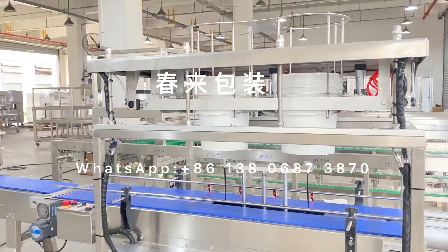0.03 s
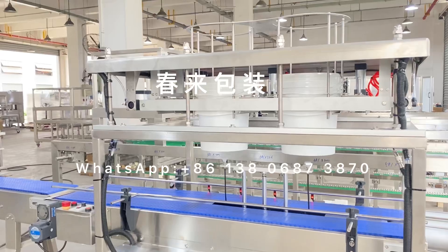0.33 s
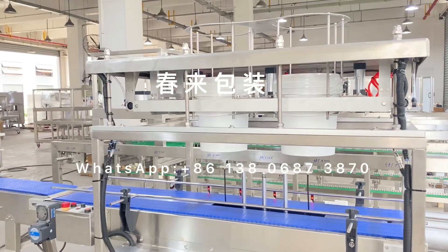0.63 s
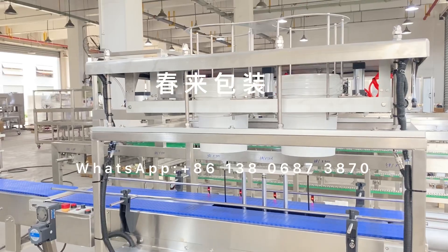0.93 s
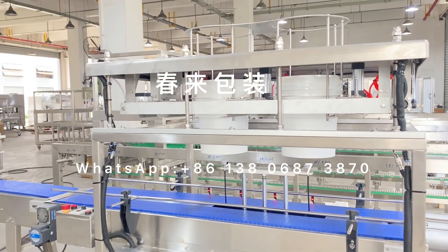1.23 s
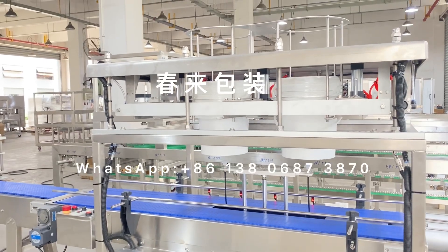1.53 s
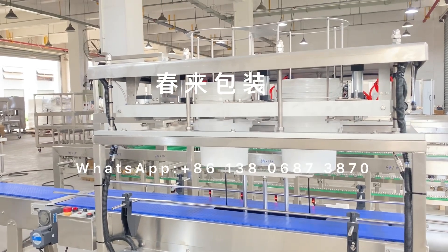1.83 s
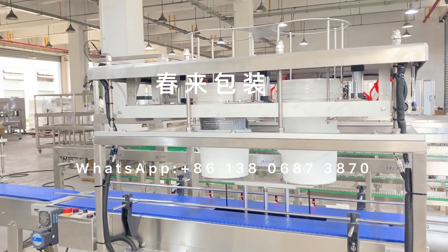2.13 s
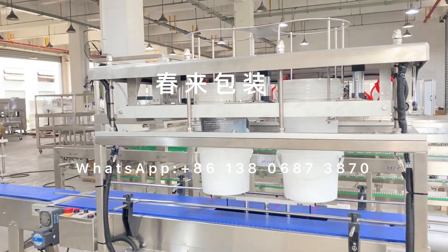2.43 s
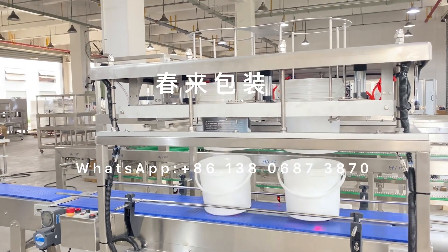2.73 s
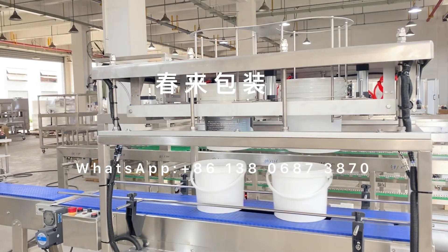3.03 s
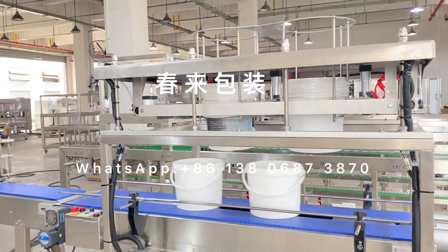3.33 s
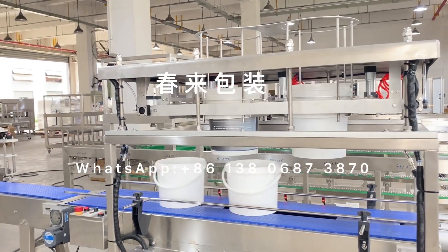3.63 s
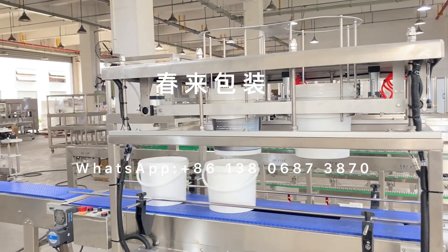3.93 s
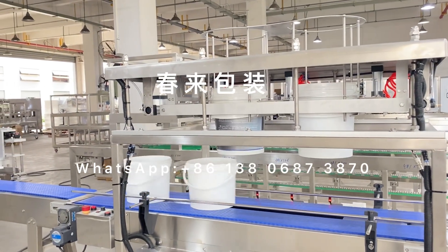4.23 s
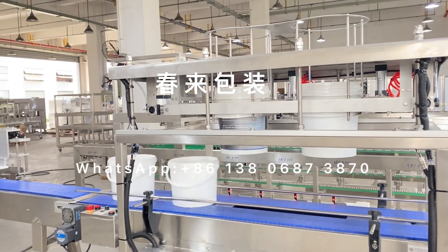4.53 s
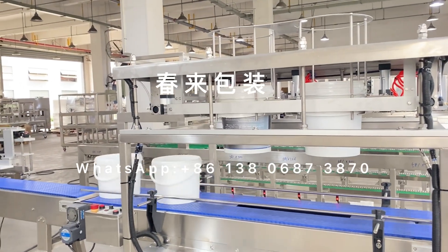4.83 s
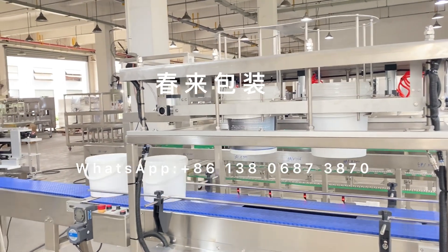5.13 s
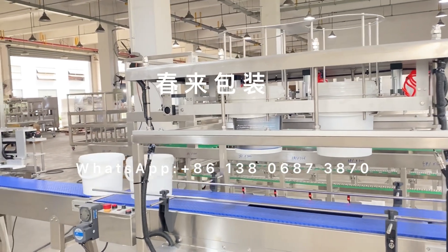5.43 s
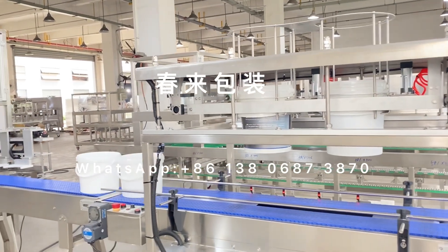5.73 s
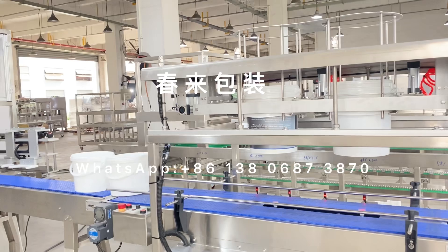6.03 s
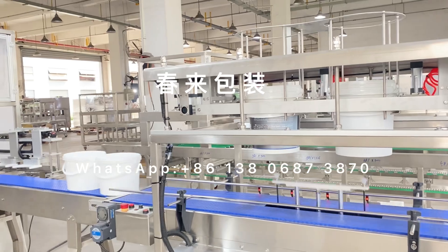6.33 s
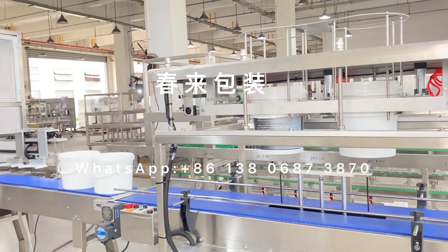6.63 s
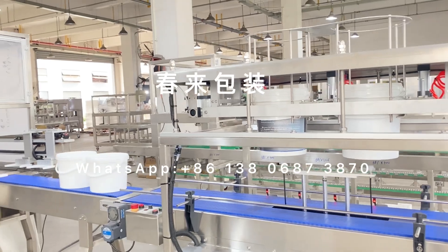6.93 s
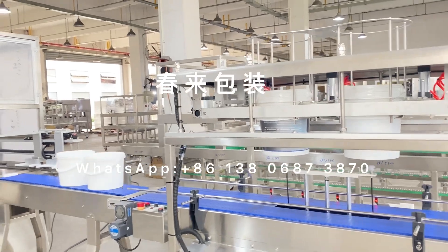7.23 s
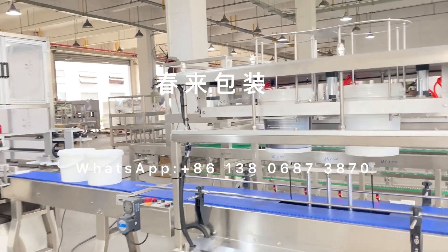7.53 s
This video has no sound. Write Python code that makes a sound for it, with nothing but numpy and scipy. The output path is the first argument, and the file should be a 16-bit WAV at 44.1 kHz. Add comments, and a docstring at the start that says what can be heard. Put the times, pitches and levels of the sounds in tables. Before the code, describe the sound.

Bright, steady compressed air rushes from a nearby bucket dispenser while motors hum and a belt rumbles. Pistons kick with puffs and sliding whistles, and two plastic buckets land with hollow thuds. The hiss dies away, leaving the conveyor and a few soft bumps against metal rails. Air then bursts on again with a squeak and keeps hissing through one more piston stroke, echoing in the factory hall.

```python
"""A pneumatic bucket dispenser over a conveyor in a factory hall. Vacuum ejectors hiss from the start;
motors hum and the belt rumbles throughout. From 1.4 s cylinders kick and vent with falling whistles.
Two plastic buckets drop on the belt near 2.8 and 3.4 s. The air shuts off at 3.7 s and the buckets
bump along the rails. At 5.7 s the air bursts on again, with a half-second blow-off jet."""
import sys
import numpy as np
from scipy import signal
from scipy.fft import rfft, irfft, next_fast_len
from scipy.io import wavfile
from scipy.ndimage import uniform_filter1d, map_coordinates

SR = 44100
rng = np.random.default_rng(int(sys.argv[2]) if len(sys.argv) > 2 else 0)


def persist_wave(psi):
    """Save psi, clipped to +-1, as 16-bit WAV."""
    counts = np.round(np.clip(psi, -1, 1) * 32767).astype(np.int16)
    wavfile.write(sys.argv[1], SR, np.atleast_2d(counts).T)


N = 334719

# Ejector valves. Each row: opens in s, shuts in s, level in dB, treble in dB, top shelf in dB.
VALVES = [(0, 1.76, -26, 1.5, 0), (1.75, 2.89, -25.5, -2.5, 1), (2.85, 3.704, -31, -0.5, -8),
          (5.743, 8, -24, 1.5, 0.5)]
# Cylinder strokes. Each row: start in s, relative kick, tube ring and puff levels in dB, puff t60 in s.
STROKES = [(1.442, -24, -15, -23, 0.9), (1.746, -23, -18, -23.5, 0.59), (2.74, -17, -51, -19, 0.28),
           (5.739, -22.5, -8.5, -19, 0.12), (6.611, -25, -14, -20, 0.43)]
RISE_PER_T60 = 0.043  # attack of squeaks and whistles


def amp(db):
    """Decibels to gain."""
    return np.exp(np.log(10) / 20 * np.asarray(db))


def unit(x):
    """x at rms 1."""
    return x / np.sqrt(np.mean(x ** 2) + 1e-20)


def along(points, hz):
    """(Hz, value) points read on a log axis."""
    knots_hz, values = np.transpose(points)
    return np.interp(np.log(hz + 1), np.log(knots_hz + 1), values)


def wobble(rate_hz):
    """Smooth random curve, rate_hz knots a second."""
    knots = rng.standard_normal(int(N * rate_hz / SR) + 4)
    return map_coordinates(knots, [np.arange(N) * rate_hz / SR])


def patches(shape, bins=3, frames=22):
    """Smooth random field over frequency and time."""
    return unit(uniform_filter1d(uniform_filter1d(rng.standard_normal(shape), bins, 0), frames, 1))


def filtered(x, response):
    """x through a fixed filter response(Hz)."""
    size = next_fast_len(x.shape[-1] + SR // 4)
    return irfft(rfft(x, size) * response(np.fft.rfftfreq(size, 1 / SR)), size)[..., :x.shape[-1]]


def swept(x, gain, size=256):
    """x through a moving filter gain(Hz, s)."""
    hz, t, spectra = signal.stft(x, SR, nperseg=size)
    return signal.istft(spectra * gain(hz[:, None], t), SR, nperseg=size)[1][:, :N]


def noise(spectrum, peaks=()):
    """Two unrelated noises, rms 1, with a (Hz, dB) spectrum and (Hz, width Hz, dB) resonances."""
    def colour(hz):
        resonance = sum(amp(db) / (1 + (2 * (hz - peak_hz) / width_hz) ** 2)
                        for peak_hz, width_hz, db in peaks)
        return amp(along(spectrum, hz)) * (1 + resonance)
    return unit(filtered(rng.standard_normal((2, N)), colour))


def whistle(centre_hz, width_hz):
    """Narrow noise band around a moving centre."""
    white = rng.standard_normal((2, 2, len(centre_hz)))
    flutter = filtered(white, lambda hz: 1 / (1 + (2 * hz / width_hz) ** 2))
    phase = 2 * np.pi * np.cumsum(centre_hz) / SR
    return unit(flutter[0] * np.cos(phase) + flutter[1] * np.sin(phase))


def held(t, on_s, off_s, rise_s, t60_s):
    """Rise at on_s, hold until off_s, then decay."""
    attack = 1 - np.exp(-np.maximum(t - on_s, 0) / rise_s)
    return attack * amp(-60 * np.maximum(t - off_s, 0) / t60_s)


def fade(t, t60_s, rise_s):
    """Soft attack at t = 0, exponential decay."""
    return held(t, 0, 0, rise_s, t60_s)


def ring(modes, t, pitch=1, length=1):
    """Damped modes of alternating sign; their strengths vary with each strike."""
    return sum((-1) ** k * amp(db + rng.normal(0, 1)) * fade(t, t60 * length, rise_s=0.0017)
               * np.sin(2 * np.pi * freq * pitch * t) for k, (freq, db, t60) in enumerate(modes))


def add(track, start_s, sound):
    """Mix a sound into a track."""
    part = track[..., round(start_s * SR):][..., :sound.shape[-1]]
    part += sound[..., :part.shape[-1]]


def jet(spectrum, peaks, echo_db, echoes=12):
    """Turbulent air, coloured by its outlet and rippled by echoes off steel panels."""
    delays_s = rng.uniform(.001, .022, echoes)
    panels = np.zeros(SR // 8)
    panels[np.round(delays_s * SR).astype(int)] = amp(echo_db) * rng.choice([-1, 1], echoes)
    panels[0] = 1
    return unit(signal.fftconvolve(noise(spectrum, peaks), panels[None], axes=1)[:, :N])


def flow(t, on_s, off_s, db, sag_db_per_s=1, shut_s=0.013, step_db=-3):
    """Jet amplitude: sags with the pressure, steps down when shut, rings on in the hall."""
    shut = np.clip((t - off_s) / shut_s, 0, 1)
    level_db = db - sag_db_per_s * (t - on_s) + step_db * shut
    return held(t, on_s, off_s, rise_s=0.0061, t60_s=1.6) * amp(level_db)


def valve_power(t):
    """Jet power, one row per ejector."""
    return np.array([flow(t, on_s, off_s, db) ** 2 for on_s, off_s, db, _, _ in VALVES])


def ejectors(dull_db_per_s=59, shelf_hz=12700, patchy_db=1.38):
    """The jets share one hiss through the silencers; it wanders with turbulence and dulls once shut."""
    # Jet spectrum. Each row: frequency in Hz, density in dB.
    spectrum = [(200, -30), (700, -9), (1450, -8.5), (1850, -5.5), (2400, -4.5), (3300, -4), (5000, 0.05),
                (6500, -0.3), (7200, -1.1), (8000, 1.5), (11000, -1.5), (13200, 2), (15500, -3)]
    # Silencer resonances. Each row: centre in Hz, width in Hz, level in dB re the jet.
    silencer = [(1611, 25, -7), (2016, 50, -2), (2103, 165, -6), (2505, 120, 1), (2867, 223, 2),
                (3156, 35, 6), (3300, 70, 4), (3390, 40, 2), (3660, 250, 1), (4090, 75, -3),
                (4410, 260, -8), (4560, 50, -3), (4772, 260, -9), (5102, 37, -5), (5360, 45, -11),
                (5632, 35, -8), (5770, 50, -12), (6108, 30, -5), (6525, 35, -8), (6652, 35, -7),
                (7085, 260, -2), (11477, 40, -8), (14797, 55, -5), (15647, 40, -7)]
    # Dulling by band. Each row: frequency in Hz, factor on the treble dB.
    dulling = [(3000, 0.078), (5000, 0.24), (7000, 0.78), (9500, 0.81), (12000, 0.99), (13800, 1.7),
               (16000, 1.5)]

    def colour(hz, t):
        power = valve_power(t) + 1e-20
        shares = power / power.sum(axis=0)
        treble_db = sum(share * (db - dull_db_per_s * np.clip(t - off_s, 0, .5))
                        for share, (_, off_s, _, db, _) in zip(shares, VALVES))
        shelf_db = np.array(VALVES)[:, -1] @ shares
        turbulence_db = patchy_db * patches((len(hz), len(t)))
        return amp(treble_db * along(dulling, hz) + shelf_db * (hz > shelf_hz) + turbulence_db)

    hiss = swept(jet(spectrum, silencer, echo_db=-19), colour, size=512)
    strength = np.sqrt(valve_power(np.arange(N) / SR).sum(axis=0))
    return hiss * strength * amp(0.19 * wobble(12))


def edge_tones(swing_db=2, swing_hz=4):
    """Air passing the ejectors' edges sings thin tones that come and go."""
    # Edge tones. Each row: centre in Hz, width in Hz, level in dB re the jet.
    tones = [(2013, 43, -29), (2508, 80, -23.5)]
    strength = np.sqrt(valve_power(np.arange(N) / SR).sum(axis=0))
    return strength * sum(amp(db + swing_db * wobble(swing_hz)) * whistle(np.full(N, hz), width_hz)
                          for hz, width_hz, db in tones)


def motors(motor_hz=49, octave_db=-10, fan_hz=171.5, fan_db=-49.5):
    """Wavering motor hum with its octave, and a faint fan drone."""
    # Hum envelope. Each row: time in s, level in dB.
    hum_levels = [(0, -55), (.5, -45), (1.15, -55), (1.7, -42.5), (2.4, -47), (4, -42.5), (6.7, -39),
                  (7.59, -45)]
    hum_db = np.interp(np.arange(N) / SR, *np.transpose(hum_levels))
    shaft = 2 * np.pi * np.cumsum(motor_hz + 1.54 * wobble(7)) / SR
    fundamental = np.sin(shaft) * amp(2.4 * wobble(7.7))
    octave = np.sin(2 * shaft) * amp(octave_db + 2.0 * wobble(6.9))
    fan_gain = amp(fan_db + 1.5 * wobble(8.6))
    fan_phase = 2 * np.pi * np.cumsum(fan_hz + 3 * wobble(11)) / SR
    return amp(hum_db) * unit(fundamental + octave) + fan_gain * np.sin(fan_phase)


def conveyor(spin_up_s=0.039, run_down_t60_s=2.1):
    """Rollers rumble unevenly; the sliding belt rustles and its drive whines faintly."""
    # Idling, belt run, lifter return. Each row: start in s, stop in s, rumble in dB, rustle in dB.
    drives = [(0, 8, -41, -44.5), (2.8, 7, -41.5, -43), (5.72, 6.3, -39.5, -39)]
    # Roller and belt spectra. Each row: frequency in Hz, density in dB.
    roller_spectrum = [(20, -38), (40, -24), (65, 1.5), (100, 0), (165, -1.5), (215, -4), (320, -2.5),
                       (450, -13), (900, -24), (2000, -42.5)]
    belt_spectrum = [(150, -52), (450, -1.5), (800, 0.5), (1400, -6), (2000, -8.5), (2130, -3.5),
                     (2260, -10), (3200, -12.5), (4200, -13), (5400, -15.5), (6500, -19), (8600, -18),
                     (11000, -23), (15500, -29)]
    # Drive whines. Each row: centre in Hz, width in Hz, level in dB re the rustle.
    whines = [(2680, 220, -6.5), (3320, 36, 6), (3630, 42, 1), (5500, 110, -6)]
    t = np.arange(N) / SR
    power = sum(np.outer(amp(levels_db), held(t, on_s, off_s, spin_up_s, run_down_t60_s)) ** 2
                for on_s, off_s, *levels_db in drives)
    rumble_gain, rustle_gain = np.sqrt(power)
    rollers = noise(roller_spectrum) * rumble_gain * amp(2.0 * wobble(22))
    belt = noise(belt_spectrum, whines) * rustle_gain * amp(0.95 * wobble(30))
    return rollers + belt


def squeaks():
    """Sliding parts squeak and opening air gaps spit; some sag in pitch."""
    # Squeaks. Each row: start in s, level in dB, pitch in Hz, sag in Hz/s, t60 in s, width in Hz.
    events = [(.215, -34, 3220, 3000, .22, 130), (.236, -25.5, 2540, 0, 0.11, 70),
              (1.752, -20.5, 7030, 2000, 0.16, 260), (2.745, -25, 3270, 0, .12, 160),
              (2.766, -31, 4130, 2200, 0.27, 109), (2.915, -32.5, 2524, 801, 0.86, 300),
              (3.17, -43, 1595, 30.5, 2.3, 65), (5.42, -42, 5300, 0, .2, 1410),
              (5.515, -43, 5300, 0, 0.18, 1410), (5.747, -11, 5780, 0, .07, 600),
              (5.88, -35, 2520, 0, 0.3, 50), (6.617, -24, 5780, -5, .09, 220),
              (6.96, -42, 2000, -1, 1.8, 60)]
    t, out = np.arange(SR) / SR, np.zeros((2, N))
    for start_s, db, hz, sag_hz_per_s, t60_s, width_hz in events:
        envelope = amp(db) * fade(t, t60_s, RISE_PER_T60 * t60_s)
        add(out, start_s, envelope * whistle(hz - sag_hz_per_s * t, width_hz))
    return out


def pistons(tube_hz=1050):
    """Each kick thumps the frame and rings the cylinder tube."""
    # Steel frame modes. Each row: frequency in Hz, level in dB, t60 in s.
    frame_modes = [(73.5, -5, 0.17), (118, -1, 0.095), (168, -1, 0.11), (279, -6.5, 0.097),
                   (369, -1, 0.048), (512, -5, 0.029), (750, -10.5, 0.052)]
    t, out = np.arange(SR // 2) / SR, np.zeros(N)
    for start_s, kick_db, tube_db, *_ in STROKES:
        tube = amp(tube_db + 5.5) * fade(t, t60_s=0.081, rise_s=.001) * np.sin(2 * np.pi * tube_hz * t)
        add(out, start_s, amp(kick_db - 0.5) * (ring(frame_modes, t) + tube))
    return out


def vents(lag_s=0.0037):
    """A puff of air escapes just after each kick."""
    # Vented air spectrum. Each row: frequency in Hz, density in dB.
    spectrum = [(200, -31), (900, -7), (1800, -6), (3000, -1), (5000, 5), (7000, 3), (11300, 3.5),
                (16000, -1)]
    t, envelope = np.arange(SR) / SR, np.zeros(N)
    for start_s, _, _, db, t60_s in STROKES:
        add(envelope, start_s + lag_s, amp(db) * fade(t, t60_s, rise_s=0.0011))
    return jet(spectrum, (), echo_db=-6) * envelope


def throttles(rest_hz=2432, tail_width_hz=340, sputter_db=0.5):
    """Each exhaust whistles down as the pressure drops, leaving a thin, lingering tail."""
    # Exhaust whistles. Each row: start in s, level in dB, first pitch in Hz, glide in s, t60 in s,
    # width in Hz, tail level in dB.
    exhausts = [(1.446, -22.5, 5820, .27, 0.36, 850, -56), (1.446, -29, 5150, .115, 0.59, 330, -50),
                (1.766, -23, 5047, .115, .38, 430, -35), (2.742, -31.5, 4416, 0.33, 0.42, 1105, -55),
                (5.756, -19, 4900, 0.11, 0.098, 700, -47), (6.616, -29, 5800, 0.093, 0.58, 1500, -52.5)]
    t, out = np.arange(SR) / SR, np.zeros((2, N))
    for start_s, db, start_hz, glide_s, t60_s, width_hz, tail_db in exhausts:
        centre_hz = rest_hz + (start_hz - rest_hz) / (1 + t / glide_s) ** 2
        burst = amp(db) * fade(t, t60_s, RISE_PER_T60 * t60_s) * whistle(centre_hz, width_hz)
        tail = amp(tail_db) * fade(t, t60_s=3, rise_s=0.09) * whistle(centre_hz, tail_width_hz)
        add(out, start_s, burst + tail)
    return out * amp(sputter_db * wobble(120))


def buckets(clatter_lag_s=0.0023):
    """Hollow bucket booms and low belt thuds; rim and handle clatter just after."""
    # Contacts; those near 100 Hz are belt thuds. Each row: start in s, relative level in dB,
    # pitch in Hz, relative clatter in dB, ring t60 in s.
    bumps = [(1.62, -30.5, 263, -6, 0.13), (2.743, -19, 372, -12, 0.043), (2.76, -25, 280, -18, .08),
             (2.787, -22, 308, -16, 0.061), (2.828, -22, 290, -16, 0.06), (2.838, -15, 284, -12, 0.067),
             (2.847, -16, 315, -18, 0.084), (2.864, -14, 94, -25, 0.087), (2.88, -26, 334, -20, .06),
             (2.932, -23, 287, -20, .06), (3.029, -23, 127, -20, 0.12), (3.385, -21.5, 291, -10, 0.066),
             (3.449, -10.5, 200, -13.5, 0.084), (3.459, -18.5, 202, -4.5, .055),
             (3.465, -20, 490, -20, 0.074), (3.479, -19.5, 296, -18, 0.081), (3.502, -20, 197, -22, 0.084),
             (3.521, -27, 280, -22, 0.076), (3.592, -23.5, 223, -22, 0.13), (3.652, -27, 207, -20, .14),
             (5.091, -21.5, 106, -17, 0.11), (5.128, -18, 339, -13.5, 0.088), (5.148, -22.5, 350, -13, .06),
             (5.531, -27, 340, -8, 0.089), (6.025, -24, 94, -18, .14), (6.068, -20.5, 350, -12, 0.06),
             (6.095, -24, 102, -22, 0.14), (6.315, -22.5, 362, -8, 0.13), (6.69, -30.5, 267, -23, .12)]
    # Modes of a boom or thud. Each row: multiple of the pitch, level in dB, share of the ring t60.
    modes = [(.45, -9, 1), (.8, -8, 1), (1, 2.5, 0.88), (1.22, -16, 0.61), (1.52, -11, 0.74),
             (1.9, -10, 0.36), (2.28, -15.5, 0.78), (2.8, -16.5, 0.75), (3.7, -13.5, 0.33)]
    # Clatter spectrum. Each row: frequency in Hz, density in dB.
    clatter_spectrum = [(150, -23.5), (450, -9), (900, -3.5), (1800, -2), (3000, -7.5), (4000, -16),
                        (12000, -25)]
    t, knocks, rattle = np.arange(SR // 4) / SR, np.zeros(N), np.zeros(N)
    burst = fade(t, t60_s=0.048, rise_s=0.00077)
    for start_s, db, pitch_hz, clatter_db, t60_s in bumps:
        add(knocks, start_s, amp(db - 2.5) * ring(modes, t, pitch_hz, t60_s))
        add(rattle, start_s + clatter_lag_s, amp(db + clatter_db) * burst)
    return knocks + struck_parts(), rattle * noise(clatter_spectrum)


def struck_parts():
    """Buckets knock the steel bed under the belt, ping the guide rails and clack rim on rim."""
    # Blows on bed, rails and rims. Each row: start in s, level in dB.
    landings = [(2.744, -25), (2.762, -32), (2.843, -30)]
    pings = [(2.845, -35), (5.072, -37.5), (5.128, -37)]
    clacks = [(3.452, -31), (3.461, -27)]
    # Their modes. Each row: frequency in Hz, level in dB, t60 in s.
    bed_modes = [(505, -2.5, 0.076), (602, -3.5, .06), (700, -4.5, .07), (850, -2, 0.071)]
    rail_modes = [(1275, 2, 0.095), (1364, -2, 0.055)]
    rim_modes = [(780, 1, 0.045), (1130, -5, 0.037), (1620, -5, .06), (1824, 0.5, .06), (2230, -3, .05)]
    t, out = np.arange(SR // 4) / SR, np.zeros(N)
    for blows, modes in ((pings, rail_modes), (landings, bed_modes), (clacks, rim_modes)):
        for start_s, db in blows:
            add(out, start_s, amp(db) * ring(modes, t))
    return out


def blow_off():
    """A second jet dumps air through a short pipe for half a second."""
    # Blow-off spectrum. Each row: frequency in Hz, density in dB.
    spectrum = [(200, -26.5), (700, -11.5), (1700, -9.5), (2400, -3), (4200, -0.5), (7300, -2.5),
                (9000, -3.5), (11000, -3), (13800, 0.5), (15600, -1.5)]
    # Pipe resonances. Each row: centre in Hz, width in Hz, level in dB re the jet.
    pipe = [(2500, 100, -8), (3280, 350, -4), (4520, 200, -7), (6720, 200, -6), (7750, 300, -5)]
    return jet(spectrum, pipe, echo_db=-13.5) * flow(np.arange(N) / SR, on_s=5.739, off_s=6.256, db=-20)


def hall(x):
    """Diffuse reverberation; the treble dies first."""
    # Hall decay. Each row: frequency in Hz, t60 in s.
    decay = [(100, 1), (300, 0.99), (1500, 0.99), (5000, 1), (14000, 0.13)]
    tail = swept(rng.standard_normal((2, SR)), lambda hz, t: fade(t, along(decay, hz), rise_s=0.0052))
    return signal.fftconvolve(np.atleast_2d(x), tail / np.linalg.norm(tail[0]), axes=1)[:, :N]


def stereo_spread(pair):
    """Two unrelated signals become left and right, alike in some bands and opposed in others."""
    # Channel likeness. Each row: frequency in Hz, correlation.
    likeness = [(60, .97), (150, .9), (330, .7), (600, .12), (1400, .05), (2400, .62), (4600, .55),
                (5600, .3), (6500, .95), (7650, .95), (8400, -.995), (9550, -.995), (10300, .95),
                (11800, .95), (12550, -.995), (13650, -.995), (14700, .95)]

    def mid_side_gains(hz):
        angle = np.arccos(np.clip(along(likeness, hz), -1, 1)) / 2
        return np.array([np.cos(angle), np.sin(angle)])

    mid, side = filtered(pair, mid_side_gains)
    return np.array([mid + side, mid - side])


def scene():
    """Knocks and hum sit in the centre; air, belt, clatter and echo spread between the channels."""
    knocks, clatter = buckets()
    hum, running = motors(), conveyor()
    thumps, puffs, whistles = pistons(), vents(), throttles() + squeaks()
    echo = hall(amp(-6.5) * (knocks + thumps) + amp(-5) * clatter
                + amp(-4.5) * puffs + amp(-8.5) * whistles)
    air = ejectors() + edge_tones() + blow_off() + puffs + whistles
    return stereo_spread(air + running + clatter + echo) + knocks + thumps + hum


def record(dry, silence_s=.036, top_hz=15820):
    """An instant of silence first; left a little stronger; nothing above top_hz."""
    # Channel balance. Each row: frequency in Hz, left minus right in dB.
    balance = [(50, 3), (120, 0.5), (500, 3.3), (1200, 0.3), (3000, 2.5), (5500, 2.5), (6600, 0)]
    gated = dry * (np.arange(N) > silence_s * SR)
    return filtered(gated, lambda hz: amp(np.outer([.5, -.5], along(balance, hz))) * (hz < top_hz))


dry = scene()
out = record(dry)
persist_wave(out)
```